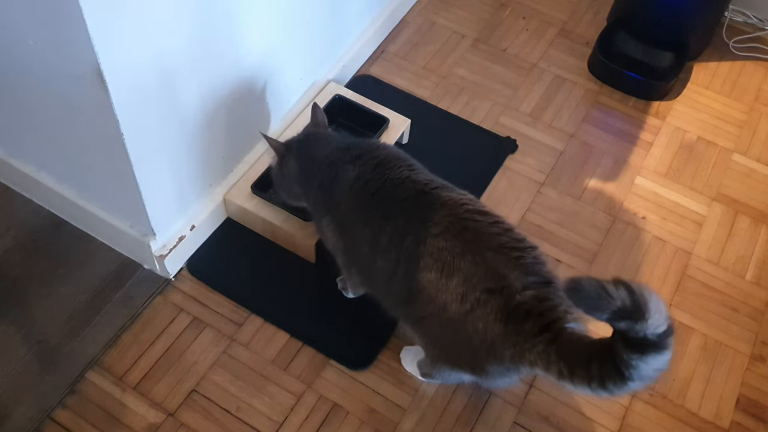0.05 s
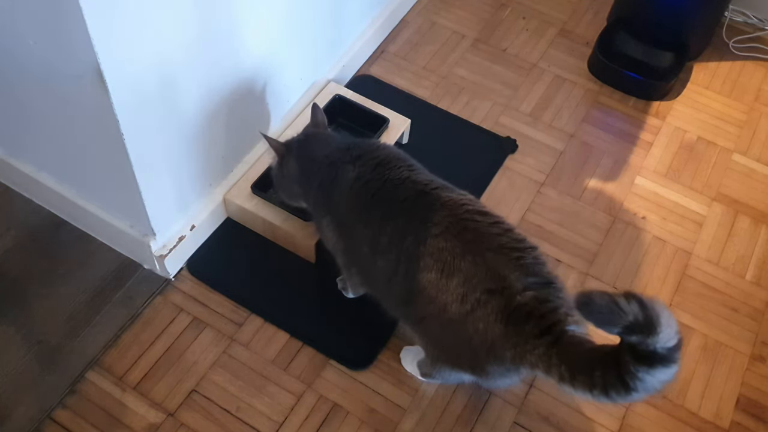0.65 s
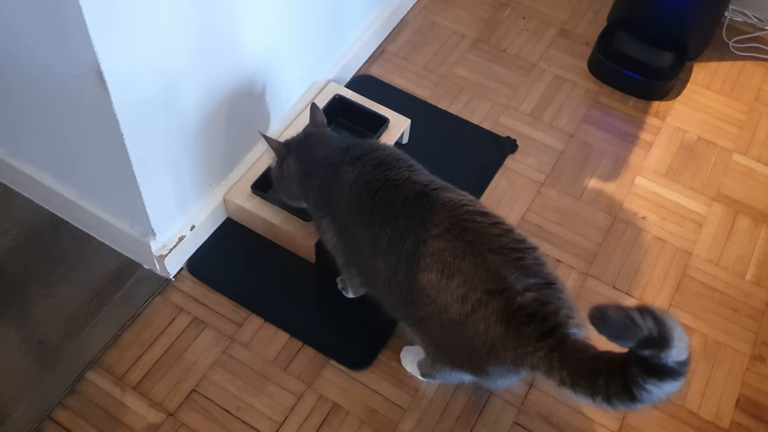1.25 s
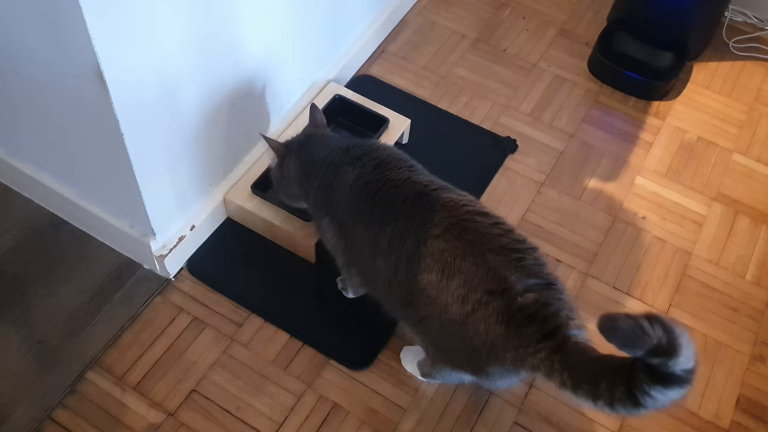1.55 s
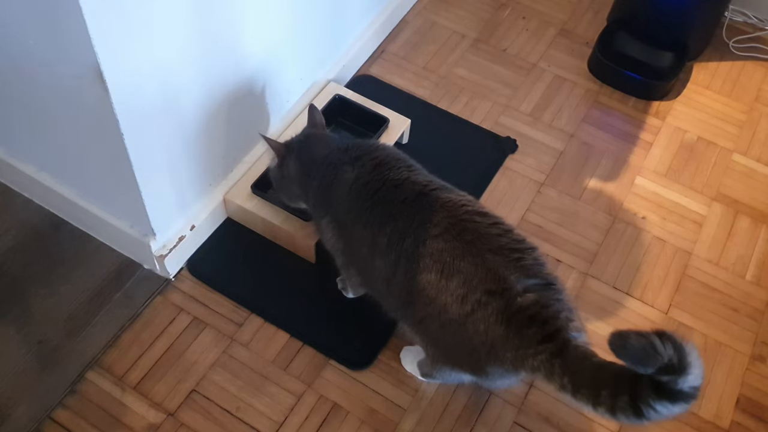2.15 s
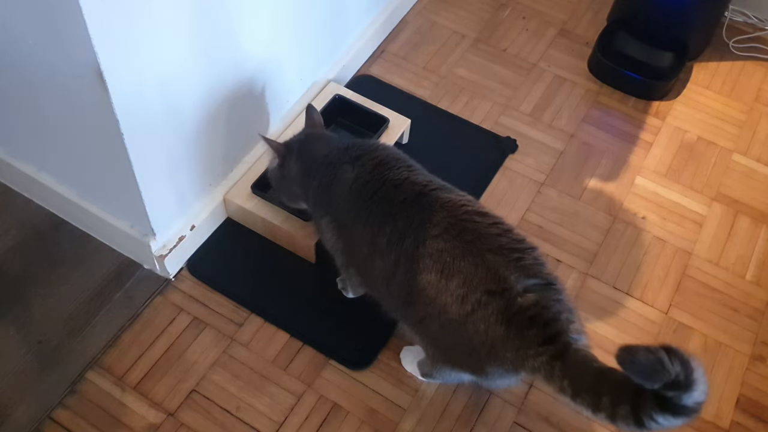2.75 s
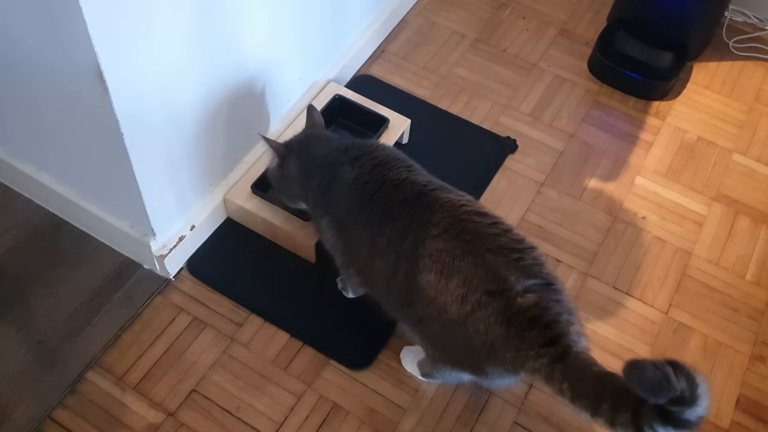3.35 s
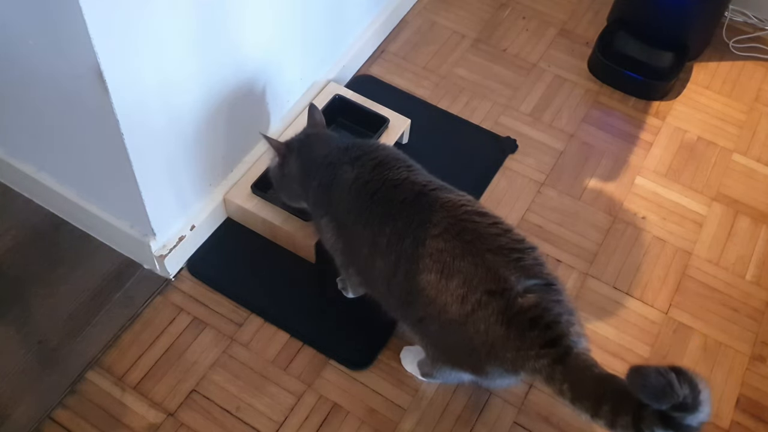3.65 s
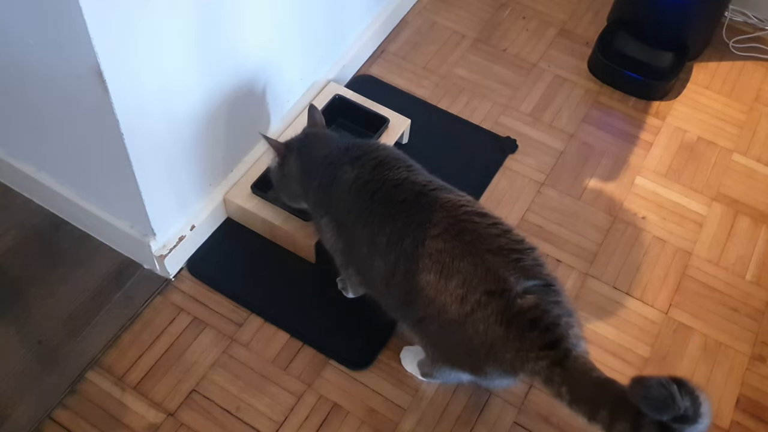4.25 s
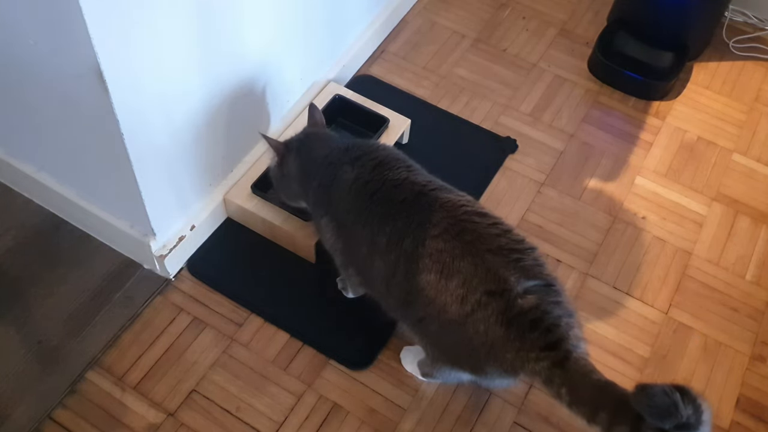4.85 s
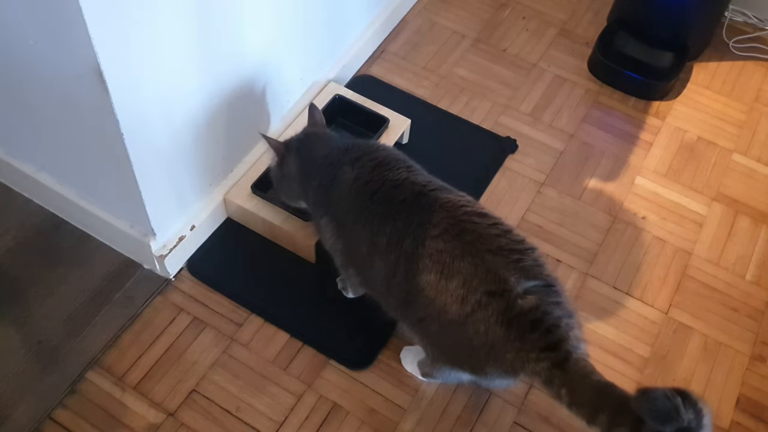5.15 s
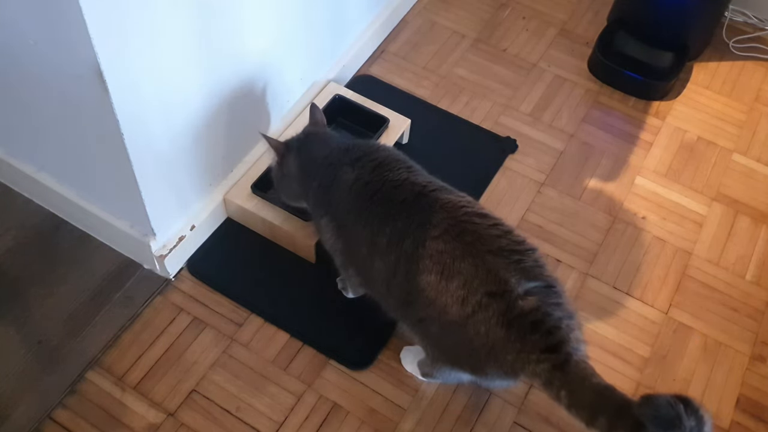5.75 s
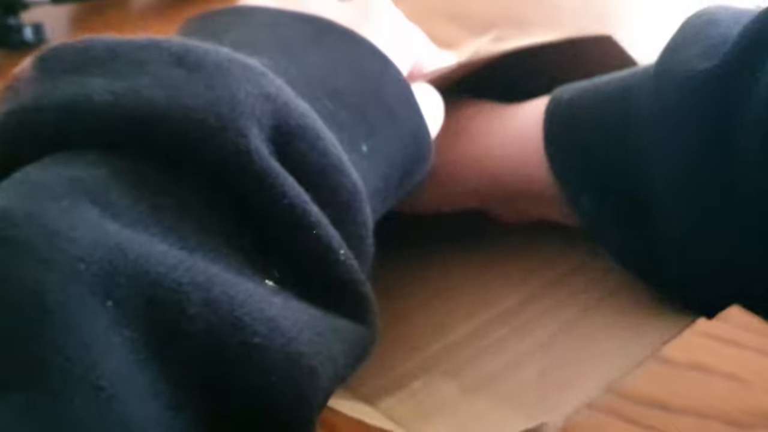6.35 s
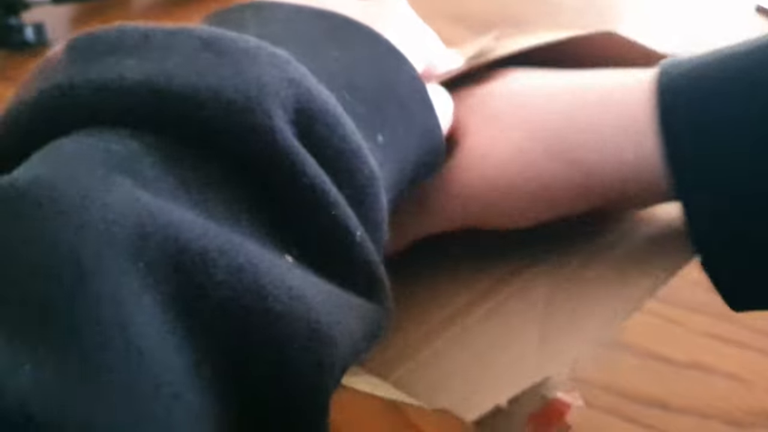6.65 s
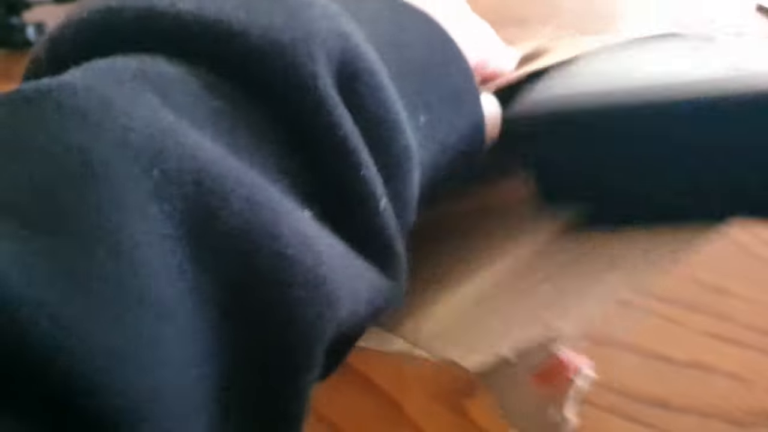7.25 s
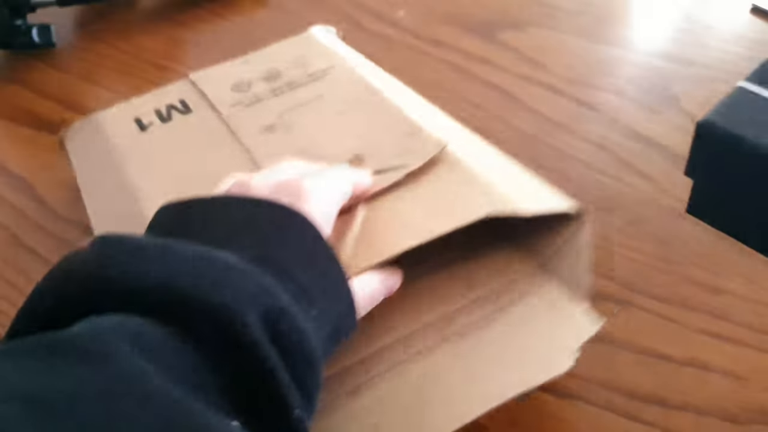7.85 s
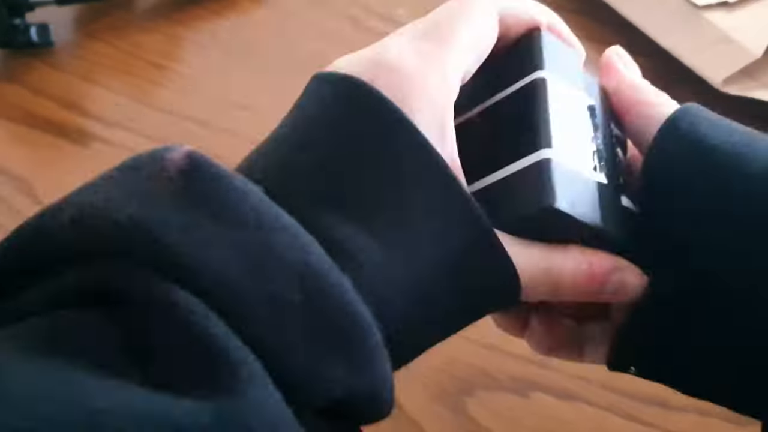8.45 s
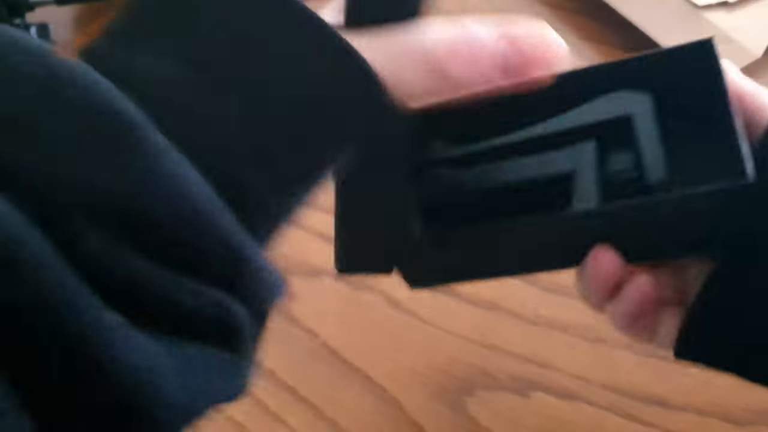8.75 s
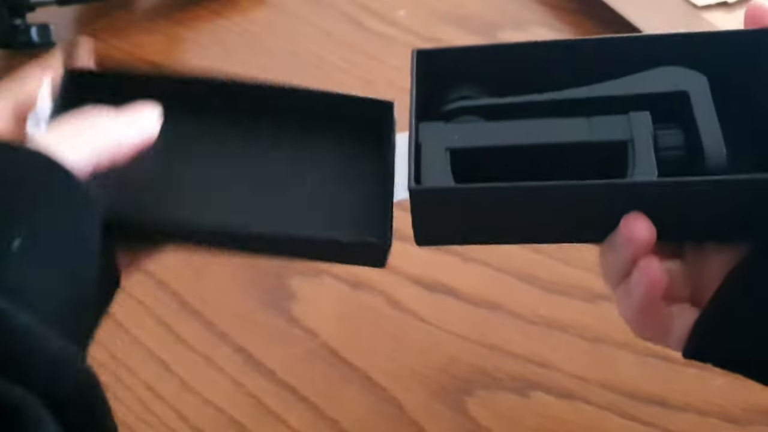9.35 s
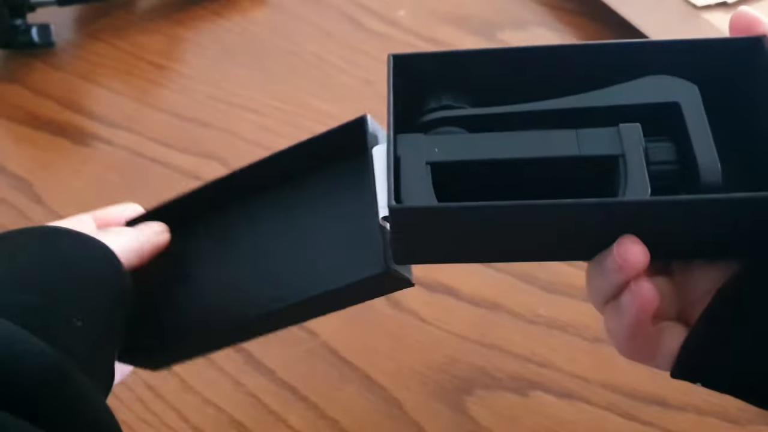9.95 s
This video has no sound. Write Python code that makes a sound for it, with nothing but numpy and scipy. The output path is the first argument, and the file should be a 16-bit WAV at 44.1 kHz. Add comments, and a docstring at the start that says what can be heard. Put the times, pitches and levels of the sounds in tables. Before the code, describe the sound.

Faint, crisp kibble bites from a cat, followed by close cardboard knocks and scraping, a sharp lid pop and tiny squeaks.

```python
"""A cat crunches dry kibble in a hard-floored room, each pellet breaking in a quick run of cracks.
Then, close by at a table, a sleeve brushes past as a box is dragged from a cardboard mailer, whose
panels knock, drum and scrape. The box's tight lid pops off, ringing the cavity, and squeaks in tiny
slips as it is folded back. The low rumble of a hand-held camera lies under both scenes."""
import sys
import numpy as np
from scipy import signal
from scipy.fft import rfft, irfft, next_fast_len
from scipy.io import wavfile
from scipy.ndimage import uniform_filter1d

SR = 44100
rng = np.random.default_rng(int(sys.argv[2]) if len(sys.argv) > 2 else 0)


def transcribe(u):
    """Save the signal u as a 16-bit wav file named by the first command-line argument.

    u: samples, shape (n,) or (channels, n), limited to [-1, 1]; the rate is SR.
    q: integer samples, one column per channel.
    """
    v = np.clip(np.atleast_2d(u).T, -1, 1)
    q = np.round(v * 32767).astype(np.int16)
    wavfile.write(sys.argv[1], SR, q)


N = 441000

TABLE_SCENE_S = 5.84  # the cat's scene ends and the table's begins
LID_START_S, LID_FREE_S, LID_CLEAR_S = 8.537, 8.66, 8.8  # the lid moves, lets go, clears the box
STROKE_ATTACK_S, STROKE_T60_S = 0.0386, 0.18

# stereo image, centred in the bass and wide in the treble: freq_hz, left_right_likeness
LIKENESS = [(180, 0.97), (450, 0.92), (900, 0.71), (2000, 0.55), (5000, 0.151), (15000, 0.072)]
# panel modes of the hollow mailer: pitch_hz, width_hz, gain_db
MAILER_MODES = [(222, 60, -9), (320, 75, -3), (420, 70, 2.5), (516, 65, 0), (760, 252, -12)]
# spectrum of a soft brushing hiss: freq_hz, level_db
BRUSH_SPECTRUM = [(1200, -31.5), (2200, -6.5), (4200, -1.5), (7300, -8), (8800, -3), (11000, -5),
                  (14200, -6), (15800, -17)]
# resonances of the lid's rubbed surface: pitch_hz, width_hz, gain_db
RASP_MODES = [(3200, 700, -2.5), (4460, 500, 0.5), (5370, 550, 0), (6550, 500, -0.5), (7900, 500, -2),
              (9300, 1000, -2), (12800, 2600, -7)]


def amp(db):
    """Decibels to gain."""
    return 10 ** (np.asarray(db) / 20)


def unit(x):
    """Scale to rms 1."""
    return x / np.sqrt(np.mean(x ** 2) + 1e-20)


def burst(x):
    """Scale a short sound to the energy of 10 ms at rms 1."""
    return x * np.sqrt(SR / 100 / (np.mean(np.sum(x ** 2, -1)) + 1e-20))


def along(points, hz):
    """Read (freq_hz, value) points on a log frequency axis."""
    freqs, values = np.transpose(points)
    return np.interp(np.log(hz + 1), np.log(freqs + 1), values)


def curve(points):
    """Join (time_s, value) points into one value per sample."""
    return np.interp(np.arange(N) / SR, *np.transpose(points))


def during(start, end):
    """A gate, open between two times, with short ramps."""
    t = np.arange(N) / SR
    return np.clip(np.minimum(t - start, end - t) / 0.0047, 0, 1)


def stroke(start, end, attack, t60):
    """Envelope: attack, hold until the end, then release."""
    t = np.arange(N) / SR
    return np.clip((t - start) / attack, 0, 1) * amp(-60 * np.clip((t - end) / t60, 0, 3))


def add(track, s, x):
    """Mix a sound in at s seconds."""
    i = max(round(s * SR), 0)
    track[..., i:i + x.shape[-1]] += x[..., :N - i]


def filtered(x, response):
    """Filter x by a complex response of frequency."""
    n = x.shape[-1]
    padded = next_fast_len(n + SR // 8)
    return irfft(rfft(x, padded) * response(np.fft.rfftfreq(padded, 1 / SR)), padded)[..., :n]


def ring(x, modes, order=1):
    """Play x through (pitch_hz, width_hz, gain_db) resonances; order 2 has steeper skirts."""
    def band(hz, pitch, width):
        return (1j * hz * width / (pitch ** 2 - hz ** 2 + 1j * hz * width)) ** order
    return filtered(x, lambda hz: sum((-1) ** k * amp(db) * band(hz, pitch, width)
                                      for k, (pitch, width, db) in enumerate(modes)))


def noise(count=N):
    """Two channels of white noise."""
    return rng.standard_normal((2, count))


def wander(count, smooth_samples):
    """A random drift of rms 1."""
    return unit(uniform_filter1d(rng.standard_normal(count), size=smooth_samples))


def grains(count, rate, spread_db):
    """Two channels of random clicks, rate a second, with heavy-tailed sizes."""
    size = amp(spread_db * np.minimum(rng.exponential(size=(2, count)), 4))
    return unit(size * rng.choice([-1, 1], (2, count)) * (rng.random((2, count)) < rate / SR))


def spread(pair, likeness=LIKENESS):
    """Blend two unrelated signals into a left and right of the given likeness."""
    def weights(hz):
        angle = np.arccos(np.clip(along(likeness, hz), -1, 1)) / 2
        return np.array([np.cos(angle), np.sin(angle)])
    mid, side = filtered(pair, weights)
    return np.array([mid + side, mid - side])


def coloured(pair, spectrum, likeness=LIKENESS):
    """A stereo texture of rms 1 with the given spectrum."""
    return unit(spread(filtered(pair, lambda hz: amp(along(spectrum, hz))), likeness))


def resonant(pair, modes, order=1):
    """A stereo texture of rms 1 that rings at the given modes."""
    return unit(spread(ring(pair, modes, order)))


def placed(x, balance):
    """The camera's body shades each microphone differently by frequency."""
    return filtered(x, lambda hz: amp(np.outer([.5, -.5], along(balance, hz))))


def room(x, t60=.29):
    """The room's diffuse tail: decaying noise after a short pre-delay."""
    t = np.arange(SR // 2) / SR
    tail = spread(noise(len(t)) * amp(-60 * t / t60))
    tail = np.pad(tail, ((0, 0), (SR // 300, 0)))
    return signal.fftconvolve(x, tail / np.linalg.norm(tail[0]), axes=1)[:, :x.shape[-1]]


def handling():
    """A steady rumble that swells, with a rub of fingers, when the hand shifts on the camera."""
    # shifts of grip: start_s, length_s, thud_db, rub_db
    grips = [(0.019, 0.094, -51, -49.5), (0.292, 0.082, -58, -58), (2.714, 0.13, -54, -61.5),
             (2.92, 0.26, -58, -74), (5.142, 0.17, -52.5, -61), (5.894, 0.65, -52, -49.5),
             (6.97, 0.21, -45.5, -51), (7.679, 0.071, -50.5, -45)]
    # steady rumble: bowl_db, table_db
    rumble_db = [-65, -59.5]
    # the camera's rumble: freq_hz, level_db
    rumble_spectrum = [(15, -40.5), (32, -7.5), (54, 4), (95, -4), (130, -12.5), (220, -15), (330, -31),
                       (700, -60)]
    # finger rub: freq_hz, level_db
    rub_spectrum = [(30, -26), (95, 8), (170, -6), (300, -19), (600, -49.5)]
    thud = amp(rumble_db[0]) * during(-1, TABLE_SCENE_S) + amp(rumble_db[1]) * during(TABLE_SCENE_S, 11)
    rub = np.zeros(N)
    for s, length, thud_db, rub_db in grips:
        shift = stroke(s, s + length, attack=0.034, t60=0.92)
        thud = np.hypot(thud, amp(thud_db) * shift)
        rub = np.hypot(rub, amp(rub_db) * shift)
    rumble = thud * coloured(noise(), rumble_spectrum, likeness=[(60, 0.88)])
    return rumble + rub * coloured(noise(), rub_spectrum)


def room_tone():
    """Each room's own faint, wide hiss."""
    # air by the cat's bowl: freq_hz, level_db
    bowl_air = [(150, -7), (270, -5), (934, -14), (1520, -14.5), (3200, -17), (7240, -27.5), (8910, -25),
                (13800, -22), (15800, -27.5)]
    # stiller air at the table: freq_hz, level_db
    table_air = [(150, -15.5), (300, -8), (450, -17.5), (1400, -26), (6000, -33), (15800, -34.5)]
    # stereo image of the air: freq_hz, left_right_likeness
    air_likeness = [(150, 0.3), (600, 0.029), (5000, -0.15)]
    bowl = amp(-68.5) * coloured(noise(), bowl_air, air_likeness)
    table = amp(-76) * coloured(noise(), table_air, air_likeness)
    return bowl * during(-1, TABLE_SCENE_S) + table * during(TABLE_SCENE_S, 11)


def crumble(t, rise, t60, stages_db):
    """A pellet crumbles in stages, each a flurry of tiny clicks."""
    clicks = spread(grains(len(t), rate=1600, spread_db=3.5), likeness=[(1000, 0.25)])
    stages = amp(stages_db * wander(len(t), smooth_samples=250))
    return clicks * stages * (1 - np.exp(-t / rise)) ** 2 * amp(-60 * t / t60)


def cracks(t, count):
    """A brittle pellet gives way in a run of cracks that builds from a small first one."""
    span_s, build_s, t60, scatter_db = .02, .004, .011, 3.5
    starts = span_s * np.append(0, (np.arange(count) + rng.random(count)) / count)[:, None]
    sizes = amp(scatter_db * rng.standard_normal(starts.shape)) * (1 - np.exp(-starts / build_s) / 2)
    envelope = np.linalg.norm(sizes * (t >= starts) * amp(-60 * np.abs(t - starts) / t60), axis=0)
    return spread(noise(len(t))) * envelope


def cat_crunch():
    """Teeth meet a pellet and crush it: jaw, mouth, teeth and pellet ring out into the room."""
    # bites, levels before each part's trim:
    # snap_s, mouth_db, teeth_db, mouth_hz, teeth_hz, ring_hz, ring_db, splinter_hz, splinter_db
    bites = [(0.262, -51, -63, 1400, 2240, 7100, -57, 11500, -60.5),
             (0.5483, -51, -59, 1390, 2200, 2800, -63, 9300, -70),
             (0.845, -55, -64, 1450, 2460, 4500, -70.5, 12300, -57),
             (1.142, -52.5, -68, 1450, 2780, 4270, -68, 12400, -70),
             (1.543, -50.5, -68.5, 1400, 2800, 6100, -62.5, 9300, -52),
             (1.8434, -54.5, -65.5, 1530, 2800, 3290, -75, 11800, -56),
             (2.149, -60.5, -72, 1510, 2400, 5000, -73, 11100, -64),
             (2.451, -49, -60.5, 1480, 2800, 6120, -58.5, 9700, -53.5),
             (2.855, -48, -62, 1560, 2250, 4380, -67, 10400, -54),
             (3.151, -52, -68, 1390, 2400, 4390, -65, 10600, -58),
             (3.4496, -52.5, -63.5, 1560, 2000, 6200, -74, 9800, -68),
             (3.8633, -51, -76, 1520, 2600, 6060, -75, 8800, -63.5),
             (4.1592, -56, -65, 1530, 2400, 5700, -65.5, 13000, -71),
             (4.908, -52, -65, 1600, 2300, 6600, -62.5, 13400, -65.5),
             (4.954, -68, -63.5, 1760, 2410, 5840, -65.5, 9800, -68),
             (5.525, -47, -61.5, 1530, 2500, 6100, -61.5, 12000, -57.5),
             (5.6933, -58, -69.5, 1550, 2400, 5200, -72, 8600, -72.5)]
    # jaw resonance: pitch_hz, width_hz, gain_db
    jaw_modes = [(1055, 660, 0)]
    # bright resonances of splintering kibble: pitch_hz, width_hz, gain_db
    splinter_modes = [(8900, 1400, 2.5), (10640, 1600, -1), (12280, 1600, -2), (14200, 1600, -6.5)]
    # small chewing ticks between bites: start_s, relative_db, pitch_hz
    ticks = [(2.62, -65, 1880), (3.18, -49.5, 1410), (4.19, -55, 1540), (4.2, -58, 2520),
             (4.45, -58.5, 1350), (4.63, -66, 5570), (5.21, -58, 1510)]
    # the cat's place in the stereo image: freq_hz, left_over_right_db
    balance = [(700, 1), (1300, 4.5), (8000, 2), (15000, -6.5)]
    mouth_width_hz, teeth_width_hz, splinter_width_hz, ring_width_ratio = 340, 1140, 3400, .17
    out, t = np.zeros((2, N)), np.arange(SR // 3) / SR
    for s, mouth_db, teeth_db, mouth_hz, teeth_hz, ring_hz, ring_db, splinter_hz, splinter_db in bites:
        touch, crush, grind = (crumble(t, rise=.009, t60=.065, stages_db=4) for _ in range(3))
        snap = cracks(t, count=7)
        jaw = amp(mouth_db - 17.5) * burst(ring(touch, jaw_modes, order=2))
        width_hz = mouth_width_hz * 2 ** rng.uniform(-.5, 1)
        mouth = amp(mouth_db - 6) * burst(ring(crush, [(mouth_hz, width_hz, 0)], order=2))
        teeth = amp(teeth_db) * burst(ring(grind, [(teeth_hz, teeth_width_hz, 0)], order=2))
        pellet = amp(ring_db) * burst(ring(snap, [(ring_hz, ring_width_ratio * ring_hz, 0)], order=2))
        # each pellet favours one part of the splinter range
        splinters = ring(ring(snap, splinter_modes, order=2), [(splinter_hz, splinter_width_hz, 0)])
        pellet += amp(splinter_db - 1.5) * burst(splinters)
        for lead_s, part in ((.015, jaw), (.009, mouth + teeth), (0, pellet)):
            add(out, s - lead_s, part + amp(0.5) * room(part))
    for s, db, hz in ticks:
        crumb = crumble(t, rise=0.0045, t60=0.048, stages_db=3.5)
        tick = amp(db - 6) * burst(ring(crumb, [(hz, 600, 0)], order=2))
        add(out, s, tick + room(tick))
    return placed(out, balance)


def patchy(x, depth_db):
    """Resonances come and go as the contact point moves."""
    spectrogram = signal.stft(x, nperseg=512)[2]
    patches = uniform_filter1d(rng.standard_normal(spectrogram.shape[1:]), size=4, axis=0)
    patches = uniform_filter1d(patches, size=8, axis=1)
    return signal.istft(spectrogram * amp(depth_db * unit(patches)), nperseg=512)[1][:, :N]


def mailer_slide():
    """Fibres catch and slip: with each stroke's effort the panels drum and the card scrapes."""
    # strokes over and inside the mailer: start_s, hardest_s, end_s, panel_db, scrape_db
    strokes = [(5.815, 5.88, 6.06, -48.5, -49.5), (6.112, 6.345, 6.42, -47.5, -46.5),
               (6.43, 6.654, 6.83, -42.5, -40), (6.79, 6.895, 7.14, -44.5, -37),
               (7.19, 7.25, 7.3, -55, -47), (7.32, 7.634, 7.81, -58.5, -55.5),
               (7.704, 7.782, 7.92, -49.5, -45.5), (7.91, 8.036, 8.02, -48.5, -50.5),
               (8.06, 8.213, 8.25, -49, -59), (8.39, 8.43, 8.4, -55, -60)]
    # scraping cardboard: freq_hz, level_db
    scrape_spectrum = [(260, -47), (450, 2), (505, 0.5), (593, -10.5), (680, -3), (896, 0.5), (1590, -5.5),
                       (2610, -7.5), (3850, -15.5), (7000, -31.5), (10000, -95)]
    ease_db_per_s = 23.5  # effort falls away on both sides of the hardest moment
    t, power = np.arange(N) / SR, np.zeros((2, N))
    for start, hardest, end, panel_db, scrape_db in strokes:
        effort_db = -ease_db_per_s * np.abs(t - hardest)
        contact = stroke(start, end, STROKE_ATTACK_S, STROKE_T60_S)
        power += (amp([panel_db + effort_db, scrape_db + effort_db]) * contact) ** 2
    panel_gain, scrape_gain = np.sqrt(power)
    panel = resonant(grains(N, rate=830, spread_db=1), MAILER_MODES)
    slips = grains(N, rate=3500, spread_db=2)
    creases = amp(-11) * grains(N, rate=50, spread_db=3)
    scrape = coloured(patchy(slips + creases, depth_db=3), scrape_spectrum)
    surge = amp(1.1 * wander(N, smooth_samples=900))  # the card sticks and surges on
    return panel_gain * panel + surge * scrape_gain * scrape


def sleeve():
    """Fleece hisses over the microphones, and the table top hums as the arm rubs along."""
    # swell of the brushing: time_s, relative_db
    swell = [(5.87, -53), (6.085, -59.5), (6.105, -49), (6.14, -61), (6.38, -54.5), (6.6, -50), (6.96, -49),
             (7.32, -56), (7.43, -76.5), (7.52, -65.5), (7.72, -66), (7.8, -60.5), (7.94, -74), (8.05, -62),
             (8.14, -71), (8.37, -88)]
    table_hz, table_width_hz = 91.5, 10
    level_db = curve(swell)
    fibres = grains(N, rate=8000, spread_db=2.4) + amp(-12) * grains(N, rate=40, spread_db=3)
    hiss = amp(level_db + 1.5) * coloured(patchy(fibres, depth_db=2.4), BRUSH_SPECTRUM)
    hum = amp(level_db - 5) * resonant(noise(), [(table_hz, table_width_hz, 0)], order=2)
    return hiss + hum


def table_bumps():
    """Soft bumps ring the table with one low, damped note each."""
    # bumps: start_s, level_db, pitch_hz, t60_s
    bumps = [(5.932, -28, 92.6, 0.13), (6.351, -16, 73.4, 0.077), (7.326, -26.5, 76, 0.089)]
    out, t = np.zeros((2, N)), np.arange(SR // 6) / SR
    for s, db, hz, t60 in bumps:
        envelope = amp(db - 60 * t / t60) * (1 - np.exp(-2 * hz * t))
        add(out, s, envelope * np.sin(2 * np.pi * hz * t))
    return out


def card(x, top_hz=4200):
    """Play x through stiff card, which swallows the top of the treble."""
    # card resonances: pitch_hz, width_hz, gain_db
    card_modes = [(750, 250, 5), (1035, 303, 5), (1327, 253, 2), (1760, 460, -7), (2700, 1100, -11),
                  (3407, 100, -17)]
    return signal.sosfilt(signal.butter(2, top_hz, fs=SR, output="sos"), ring(x, card_modes))


def mailer_hits():
    """A blow rings the hollow mailer and snaps its card; a press does so gradually; edges flick."""
    # box against mailer, levels before trim: start_s, body_db, snap_db
    knocks = [(6.104, -19.5, -30), (6.119, -21, -32), (6.129, -16, -30), (6.143, -30, -29.5),
              (6.447, -26.5, -35), (6.539, -23, -30.5), (6.723, -39, -29), (6.78, -36, -33.5),
              (7.318, -23, -36), (7.701, -17, -24.5), (7.71, -20, -41), (8.052, -27.5, -43.5)]
    # fingers buckle the card, levels before trim: time_s, body_db, crumple_db
    presses = [(6.101, -22.5, -35), (6.12, -21, -31.5), (6.479, -23, -48), (7.787, -24, -41.5),
               (7.856, -27.5, -42.5), (8.132, -27, -61.5), (8.212, -29.5, -54), (8.427, -31.5, -55)]
    # card edges flick past each other: start_s, relative_db, pitch_hz
    flicks = [(6.206, -44, 8260), (6.24, -43, 8000), (6.348, -30.5, 1580), (6.349, -38, 8300),
              (7.321, -43, 10700), (7.803, -43.5, 6460), (8.443, -50, 2200), (8.6708, -23.5, 1620),
              (8.837, -39, 4200)]
    out, t = np.zeros((2, N)), np.arange(SR // 6) / SR
    for s, body_db, snap_db in knocks:
        blow = spread(noise(len(t))) * amp(-60 * t / 0.016)
        body = amp(body_db - 8.5) * burst(ring(blow, MAILER_MODES, order=2))
        add(out, s, body + amp(snap_db - 5) * burst(card(blow)))
    for s, body_db, crumple_db in presses:
        buckle = spread(noise(len(t))) * t ** 2 * amp(-60 * t / 0.065)
        body = amp(body_db - 9.5) * burst(ring(buckle, MAILER_MODES, order=2))
        add(out, s - .014, body + amp(crumple_db + 3.5) * burst(card(buckle)))
    for s, db, hz in flicks:
        flick = spread(noise(len(t))) * amp(-60 * t / 0.015)
        add(out, s, amp(db - 9.5) * burst(ring(flick, [(hz, 1100, 8.5), (11500, 7800, -5.5)])))
    return out


def judder():
    """The box jerks through the mailer's mouth in coarse slips that rattle the card."""
    # the box catches: start_s, end_s, level_db
    catch = (6.812, 6.905, -39)
    start, end, db = catch
    slips = grains(N, rate=600, spread_db=1.5)
    return amp(db) * stroke(start, end, attack=0.024, t60=0.079) * unit(spread(card(slips)))


def edge_drag():
    """A cut edge of the mailer catches in fine slips and rasps in its own narrow band."""
    # drags: start_s, end_s, level_db
    drags = [(7.475, 7.645, -56.5), (7.885, 8.065, -61.5)]
    # resonances of the edge: pitch_hz, width_hz, gain_db
    edge_modes = [(2540, 550, 0.5), (3180, 820, -0.5), (4500, 800, -9)]
    level = sum(amp(db) * stroke(start, end, STROKE_ATTACK_S, STROKE_T60_S) for start, end, db in drags)
    return level * resonant(grains(N, rate=2000, spread_db=0.5), edge_modes)


def lid_rub():
    """The tight lid drags and the closed box drones; once free it scrapes the hollow, then brushes."""
    # the closed box: pitch_hz, width_hz, gain_db
    closed_modes = [(404.6, 90, 3), (870, 300, -16), (2000, 1400, -27)]
    # the open box: pitch_hz, width_hz, gain_db
    open_modes = [(1000, 302, -1.5), (1450, 380, -2), (1900, 2600, -12.5), (480, 270, -8.5)]
    # the loose lid brushes box and fingers: start_s, length_s, level_db
    brushes = [(8.591, 0.03, -50.5), (8.8, .05, -61), (8.873, 0.025, -57), (9.118, 0.05, -71.5),
               (9.329, .035, -68), (9.497, 0.087, -76)]
    drone = resonant(grains(N, rate=1400, spread_db=0), closed_modes, order=2)
    drone *= amp(-41) * stroke(LID_START_S, LID_FREE_S, attack=0.02, t60=0.055)
    hollow = resonant(grains(N, rate=2000, spread_db=0), open_modes, order=2)
    hollow *= amp(-35.5) * stroke(LID_FREE_S, LID_FREE_S, attack=0.0049, t60=0.55)
    hiss = coloured(noise(), BRUSH_SPECTRUM)
    hiss *= amp(-50.5) * stroke(LID_FREE_S, LID_FREE_S, attack=.008, t60=0.55)
    brush = resonant(noise(), RASP_MODES)
    brush *= sum(amp(db) * stroke(s, s + length, attack=0.022, t60=0.077) for s, length, db in brushes)
    touching = stroke(LID_FREE_S, LID_CLEAR_S, attack=0.002, t60=0.12)
    return drone + touching * (hollow + hiss) + brush


def lid_pop():
    """As the lid lets go, air puffs through the gap and rings the box's cavity for a few cycles."""
    # the lid slips and lets go: start_s, level_db, cavity_hz, t60_s
    pops = [(8.619, -25.5, 880, 0.044), (8.622, -13, 597, 0.006), (8.66, -3.5, 1124, 0.0059),
            (8.6625, -1, 1010, 0.011), (8.666, -22.5, 1450, 0.024)]
    # partials of the box: ratio_to_cavity_pitch, level_db
    partials = [(.42, -21), (1.001, 1.5), (1.649, -11), (2.33, -11.5), (3.08, -19), (4.202, -27.5)]
    puff_hz, puff_width_hz, puff_below_pop_db, puff_t60_s = 3200, 2700, 23.5, 0.01
    out, t = np.zeros((2, N)), np.arange(SR // 10) / SR
    onset = 1 - np.exp(-t / 0.0004)
    for s, db, hz, t60 in pops:
        cavity = sum(amp(level) * np.sin(2 * np.pi * hz * ratio * t) for ratio, level in partials)
        puff = resonant(noise(len(t)), [(puff_hz, puff_width_hz, 0)], order=2)
        puff *= amp(-puff_below_pop_db - 60 * t / puff_t60_s)
        add(out, s, amp(db) * (cavity * amp(-60 * t / t60) + puff) * onset)
    return out


def lid_squeaks():
    """Uneven slips at a gliding rate ring the lid and rasp its surface; faster slips are smaller."""
    # squeaks: start_s, length_s, first_slips_per_s, last_slips_per_s, level_db
    squeaks = [(9.134, .042, 372, 274, -55), (9.237, 0.084, 274.4, 621, -50.5)]
    # resonances of the lid: pitch_hz, width_hz, gain_db
    lid_modes = [(590, 152, -0.5), (826, 128, 2.5), (1190, 300, -6.5), (1470, 170, -5.5),
                 (2420, 260, -12.5)]
    lowpass_hz = 2500
    out = np.zeros((2, N))
    for s, length, first, last, db in squeaks:
        rate = curve([(s, first), (s + length, last)])
        unsteady = 1 + 0.075 * wander(N, smooth_samples=90)
        pulses = np.diff(np.floor(np.cumsum(rate * unsteady) / SR), prepend=0)
        slips = pulses * amp(1.5 * rng.standard_normal(N)) / rate
        tone = filtered(ring(slips, lid_modes), lambda hz: 1 / (1 + 1j * hz / lowpass_hz))
        tone *= stroke(s, s + length, attack=0.024, t60=0.043)
        out += amp(db) * unit(tone) * np.sqrt(length * SR / N)  # level over the squeak's own length
        rasp = unit(ring(unit(slips) + .5 * noise(), RASP_MODES))
        out += amp(db - 6.5) * rasp * stroke(s, s + length, attack=0.07, t60=0.079)
    return out


def scene():
    """The cat is a step away; the box is close, so its room is fainter, and faintest for the pop."""
    # the box's place in the stereo image: freq_hz, left_over_right_db
    box_balance = [(200, -1), (600, 1), (2000, 2.1), (8000, 1.5), (15000, -6.5)]
    unpacking = table_bumps() + mailer_hits()
    unpacking += (mailer_slide() + sleeve()) * during(TABLE_SCENE_S - .004, LID_FREE_S)
    unpacking += judder() + edge_drag() + lid_rub() + lid_squeaks()
    pop = lid_pop()
    box = unpacking + pop + room(amp(-8) * unpacking + amp(-17.5) * pop)
    return cat_crunch() + placed(box, box_balance) + handling() + room_tone()


def record(dry):
    """The camera keeps nothing above its band limit."""
    top_hz = 15850
    return filtered(dry, lambda hz: hz < top_hz)


dry = scene()
out = record(dry)
transcribe(out)
```